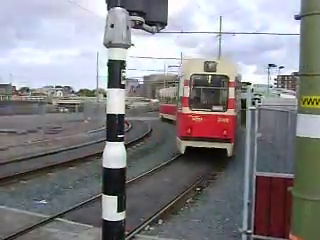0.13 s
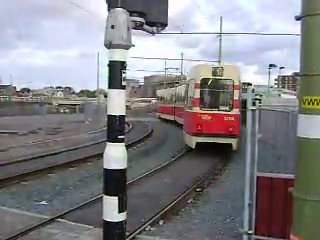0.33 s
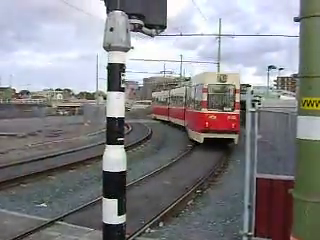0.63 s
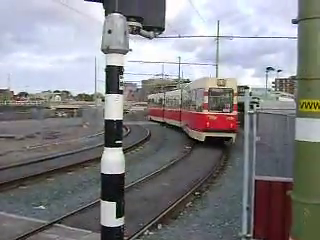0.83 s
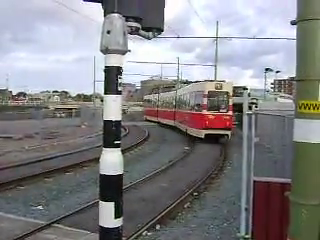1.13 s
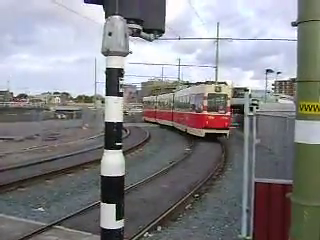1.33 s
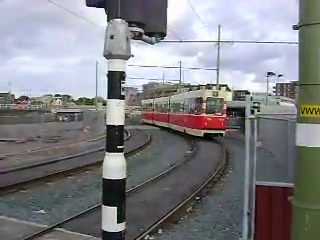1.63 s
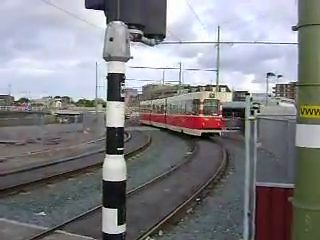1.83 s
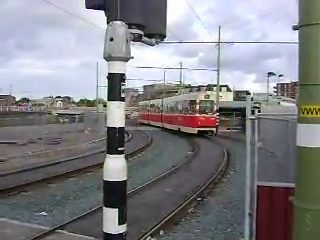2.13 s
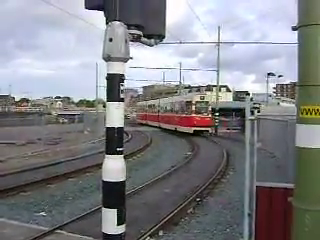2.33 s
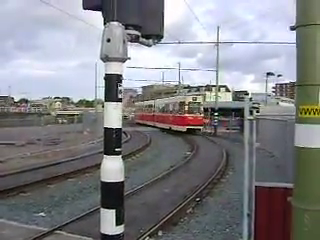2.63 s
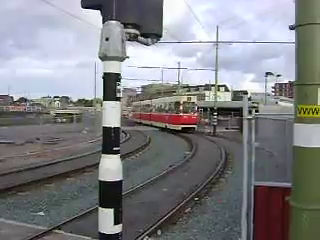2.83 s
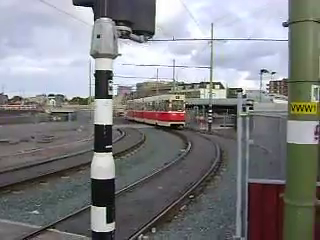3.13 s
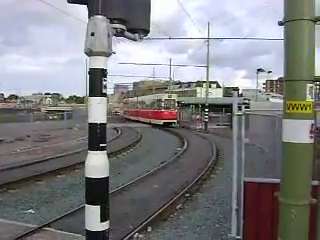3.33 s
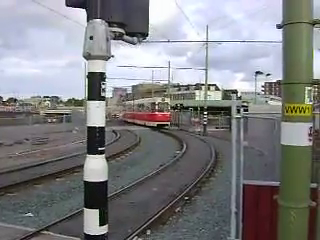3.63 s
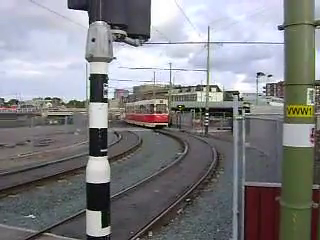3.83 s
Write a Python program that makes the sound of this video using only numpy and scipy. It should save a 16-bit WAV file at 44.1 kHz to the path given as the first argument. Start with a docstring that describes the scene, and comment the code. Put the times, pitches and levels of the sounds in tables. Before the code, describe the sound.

Loud wheel squeal from a tram rounding a bend, with metallic scraping and fading rolling rumble; after a near-silent gap come a soft knock and a weaker squeal, over town hum, light wind and yard echoes.

```python
"""Outdoors, beside a tight curve with echoes off a yard: a tram draws away over the town's hum.
From the start two wheels stick and slip, singing a few hertz apart near 1576 Hz so the squeal throbs, while
the flanges grind, bite and rasp and ring the wheel. The squeal sinks near 1.9 s, returns from 2.1 s, nearly
goes at 2.8 s, where the grinding sinks too; a dull knock comes at 3.28 s and a fainter squeal from 3.5 s.
All along, shaped noise makes the rolling fade, and soft puffs of wind touch the microphone."""
import sys
import numpy as np
from scipy import signal
from scipy.fft import rfft, irfft
from scipy.io import wavfile
from scipy.ndimage import uniform_filter1d

SR = 44100
rng = np.random.default_rng(int(sys.argv[2]) if len(sys.argv) > 2 else 0)


def wrap_up_sound(samples):
    """Save the sound to the file named by the first command line argument, as 16-bit audio."""
    columns = np.atleast_2d(samples).T
    # keep every value between -1 and 1, then stretch to whole-number steps
    tamed = np.clip(columns, -1, 1)
    steps = np.round(tamed * 32767).astype(np.int16)
    wavfile.write(sys.argv[1], SR, steps)


N = 176400
T = np.arange(N) / SR  # time in s


def undb(db):
    """Decibels to amplitude gain."""
    return 10 ** (np.asarray(db) / 20)


def unit(x):
    """Scale to rms 1."""
    return x / np.sqrt(np.mean(x ** 2))


def curve(rows, axis=1):
    """Gain over time, interpolated in dB from one column of a table."""
    rows = np.array(rows)
    return undb(np.interp(T, rows[:, 0], rows[:, axis]))


def swell(at, length):
    """A Gaussian rise and fall around one moment; length is its standard deviation in s."""
    return np.exp(-.5 * ((T - at) / length) ** 2)


def noise():
    """White Gaussian noise."""
    return rng.standard_normal(N)


def walk(rate):
    """Smooth random drift of rms 1: noise under a Gaussian low-pass, rate in Hz."""
    f = np.fft.rfftfreq(N, 1 / SR)
    return unit(irfft(rfft(noise()) * np.exp(-.5 * (f / rate) ** 2), N))


def colour(x, points):
    """Shape a spectrum by (Hz, dB) points, falling beyond both ends, steeper at the top; rms 1."""
    hz, db = np.array(points).T
    f = np.maximum(np.fft.rfftfreq(N, 1 / SR), 1)
    ends = np.minimum(f / hz[0], 1) ** 2 * np.minimum(hz[-1] / f, 1) ** 10
    gain = undb(np.interp(np.log(f), np.log(hz), db))
    return unit(irfft(rfft(x) * ends * gain, N))


def resonate(x, hz, width):
    """One resonance, gain 1 at its centre."""
    b, a = signal.iirpeak(hz, hz / width, fs=SR)
    return signal.lfilter(b, a, x)


def band(hz, width):
    """Noise passed twice through one resonance; rms 1."""
    once = resonate(noise(), hz, width)
    return unit(resonate(once, hz, width))


def turn(hz):
    """Phase of an oscillation with a moving pitch."""
    return 2 * np.pi * np.cumsum(hz) / SR


# Puffs of wind at the microphone: centre t/s, spread/s, level/dB
WIND_PUFFS = [(0.877, .04, -42), (1.362, 0.099, -51), (2.889, 0.045, -43.5), (3.216, .045, -46.5),
              (3.83, 0.044, -47)]
PUFF_HZ, PUFF_PASS_WIDTH_HZ = 93.7, 450
# Spectrum of the distant town: f/Hz, relative density/dB
TOWN_COLOUR = [(25, 1), (130, -1.5), (500, -1), (1400, -0.5), (1750, -6), (2050, -14), (3600, -16.5),
               (4800, -23.5), (5200, -23.5), (5600, -42), (6200, -47.5)]
TOWN_DB = -46.5  # mean level, which sways slowly


def air():
    """Far town hum as swaying shaped noise, and close puffs of low noise as wind on the microphone."""
    puffs = sum(undb(db) * swell(s, length) for s, length, db in WIND_PUFFS)
    wind = band(PUFF_HZ, PUFF_PASS_WIDTH_HZ) * puffs
    town = undb(TOWN_DB + 2.4 * walk(1.4)) * colour(noise(), TOWN_COLOUR)
    return wind + town


# Rolling noise fading with distance: t/s, level/dB
ROLL_LEVEL = [(0, -30.5), (.25, -33), (.9, -35), (1.4, -36.5), (2, -39.5), (2.6, -41.5), (2.9, -45),
              (3.1, -53), (4, -62)]
# Spectrum of the rolling noise: f/Hz, relative density/dB
ROLL_SPECTRUM = [(100, -10), (250, -11), (330, -5.5), (430, -0.5), (700, -5), (1050, -5), (1300, -8.5),
                 (1750, -6.5), (2000, -15.5), (2700, -12), (4200, -16), (5200, -33.5)]
# Faint ring of the rails: t/s, level/dB
RAIL_RING = [(0, -46.5), (1.7, -54), (2.05, -42), (2.4, -51.5), (3.2, -65), (4, -56.5)]
RAIL_RING_HZ, RAIL_RING_PASS_WIDTH_HZ = 2822, 41
# Low groans of the running gear: centre t/s, spread/s, level/dB, f/Hz
GEAR_GROANS = [(1.936, .06, -37, 609), (2.748, 0.079, -44.5, 561), (3.548, .018, -43.5, 720)]
GROAN_PASS_WIDTH_HZ = 180
# Spectrum of the dull knock: f/Hz, relative density/dB
KNOCK_SPECTRUM = [(60, -2.5), (200, 9), (700, -2), (1500, -4), (2500, -18), (5000, -22), (6500, -53)]
KNOCK_S, KNOCK_DECAY_S, KNOCK_DB = 3.28, 0.024, -33.5


def running_gear():
    """Shaped noise rumbles, narrow noise rings the rails and groans, and a decaying burst knocks."""
    roll = undb(0.8 * walk(25)) * colour(noise(), ROLL_SPECTRUM) * curve(ROLL_LEVEL)
    rail_ring = band(RAIL_RING_HZ, RAIL_RING_PASS_WIDTH_HZ) * curve(RAIL_RING)
    groans = sum(undb(db) * swell(s, length) * band(hz, GROAN_PASS_WIDTH_HZ)
                 for s, length, db, hz in GEAR_GROANS)
    knock_decay = (T > KNOCK_S) * np.exp(-abs(T - KNOCK_S) / KNOCK_DECAY_S)
    knock = undb(KNOCK_DB) * knock_decay * colour(noise(), KNOCK_SPECTRUM)
    return roll + rail_ring + groans + knock


GRAINS_PER_S, GRAIN_SPREAD_DB, CHATTER_DB = 3000, 3, 1.13


def friction():
    """Dense tiny impacts of steel on steel, at random moments, their strength swayed by chatter."""
    struck = rng.random(N) < GRAINS_PER_S / SR
    strength = undb(GRAIN_SPREAD_DB * noise() + CHATTER_DB * walk(48))
    return struck * noise() * strength


# Ringing modes of the wheel: f/Hz, width/Hz, relative level/dB
WHEEL_MODES = [(1470, 67, -2), (2190, 4.7, -4.5), (2528, 21, -5.5), (2760, 23, -21), (3160, 28, -1.5),
               (3281, 22, 12.5), (3490, 20, -5.5), (3811, 22, 1.5), (4090, 20, -4.5), (4600, 50, -18),
               (4835, 15, -13.5)]


def wheel(push):
    """The wheel's modes, parallel resonances, ring under a push; rms 1."""
    return unit(sum(undb(db) * resonate(push, hz, width) for hz, width, db in WHEEL_MODES))


# Force of the flange on the rail: t/s, level before the scrape and ring gains/dB
FLANGE_FORCE = [(0, -37), (0.12, -38), (0.3, -28.5), (0.43, -39.5), (0.55, -26), (0.64, -32.5),
                (0.83, -23.5), (1.03, -34.5), (1.12, -35), (1.18, -30), (1.33, -36.5), (1.42, -28),
                (1.55, -35), (1.68, -28.5), (1.92, -43.5), (2.24, -45), (2.4, -29.5), (2.56, -42.5),
                (2.68, -43.5), (2.78, -63), (3.45, -61.5), (3.8, -50.5), (4, -58)]
# Spectrum of the scrape: f/Hz, relative density/dB
SCRAPE_COLOUR = [(1800, -19.5), (2650, -20.5), (2950, -7), (3100, -4.5), (3600, 0), (4100, -4.5),
                 (4420, -7), (4850, -4), (5300, -10), (5520, -16), (5750, -18.5), (6000, -42),
                 (6300, -43.5)]
SCRAPE_DB, RING_DB = -0.5, -5.5  # shares of scrape and wheel ring
# Hard bites, each making one mode squeak: centre t/s, spread/s, level/dB, f/Hz
FLANGE_BITES = [(.212, 0.018, -35, 2484), (.217, 0.015, -21.5, 3790), (0.235, 0.018, -34, 2195),
                (.297, .014, -35, 2230), (0.501, 0.011, -19, 4725)]
BITE_JITTER_HZ = 17
# Short shrill rasps: centre t/s, spread/s, level/dB, f/Hz
FLANGE_RASPS = [(0.211, 0.011, -28, 3407), (0.216, 0.014, -34.5, 4300), (0.219, 0.013, -30.5, 5390),
                (1.183, 0.01, -32.5, 4500), (1.371, 0.01, -36.5, 3630), (1.679, 0.011, -29, 3700),
                (3.3, 0.014, -55, 4400), (3.545, .01, -46, 4170), (3.748, 0.012, -31.5, 4740),
                (3.816, 0.011, -32.5, 4770), (3.91, 0.01, -30.5, 4680), (3.973, .012, -35.5, 4710)]
RASP_WIDTH_HZ = 160


def flange():
    """Friction grains scrape and ring the wheel; jittered sines squeak at bites, narrow scrape rasps."""
    grains = friction()
    scrape = colour(grains, SCRAPE_COLOUR)
    steel = undb(SCRAPE_DB) * scrape + undb(RING_DB) * wheel(grains)
    grind = steel * curve(FLANGE_FORCE) * undb(1.8 * walk(32))
    bites, rasps = 0, 0
    for s, length, db, hz in FLANGE_BITES:
        squeak = unit(np.sin(turn(hz + BITE_JITTER_HZ * walk(80))))
        bites = bites + undb(db) * swell(s, length) * squeak
    for s, length, db, hz in FLANGE_RASPS:
        shrill = unit(resonate(scrape, hz, RASP_WIDTH_HZ))
        rasps = rasps + undb(db) * swell(s, length) * shrill
    return grind + bites + rasps


# Stretches of beating: start t/s, end t/s, beat f/Hz, moment of one swell t/s,
# second wheel's mean level against the first/dB
BEAT_STRETCHES = [(0, 1.105, 10.8, 0.4982, -8), (1.112, 1.946, 10.38, 1.27, -12),
                  (1.964, 3.105, 9.6, 2.27, -8.5), (3.11, 4.1, 9.96, 3.672, -8)]
# Pitch of the leading wheel before wander and jitter: t/s, f/Hz
LEADING_PITCH = [(0, 1575.5), (2.6, 1576), (3.4, 1578.5)]
WANDER_HZ, JITTER_HZ = 1.3, 3.  # rms of slow and fast pitch drift
# Strength of the squeal before the gain below: t/s, level/dB
SQUEAL_LEVEL = [(0, -20.5), (0.22, -12), (0.42, -18), (0.5, -13), (0.62, -20), (0.74, -11.5), (0.88, -20),
                (0.97, -15), (1.12, -19.5), (1.42, -20), (1.63, -16), (1.87, -34.5), (2.0, -34.5),
                (2.08, -23), (2.3, -20.5), (2.59, -22), (2.8, -52), (3.39, -54.3), (3.56, -28.5),
                (3.68, -25), (3.85, -29), (4, -28.5)]
SQUEAL_GAIN_DB, FLUTTER_DB = 1.5, 0.84
# Brief dips of the squeal: centre t/s, spread/s, depth/dB
SQUEAL_DIPS = [(0.065, 0.0046, -15.5), (.308, 0.0065, -16), (.432, 0.0056, -13), (0.662, 0.007, -11.5),
               (0.911, 0.0026, -14), (2.132, .005, -13.5), (2.423, 0.0062, -11), (3.869, 0.0046, -13)]
SCATTER_DB, SCATTER_HZ = -13.5, 34.7  # each scattered part, and how fast it changes
# Overtones before their gains: t/s, second harmonic level/dB, third harmonic level/dB
OVERTONE_LEVELS = [(0, -49.5, -62), (0.25, -33, -29.5), (0.42, -37, -44.5), (0.52, -44.5, -34),
                   (0.87, -24, -23), (1.0, -32, -34.5), (1.5, -37.5, -33), (1.75, -45.5, -41),
                   (1.98, -51, -62.2), (2.1, -47, -46), (2.25, -41, -44), (2.43, -29.5, -24.5),
                   (2.8, -64, -74), (3.45, -72, -79), (3.7, -50.5, -43), (4, -52, -50.5)]
SECOND_GAIN_DB, THIRD_GAIN_DB = 0.5, 0.5
OVERTONE_FLUTTER_DB, OVERTONE_JITTER_HZ = 3.5, 18
THROB_DB = 2.5  # peak swing of the overtones with the beat


def squeal():
    """Two wheels stick and slip a few hertz apart and beat; rough overtones throb with them."""
    tone, throb = 0, 0
    steady_pitch = np.interp(T, *np.array(LEADING_PITCH).T)
    pitch = steady_pitch + WANDER_HZ * walk(8) + JITTER_HZ * walk(130)
    phase = turn(pitch)
    for start, end, beat_hz, swell_s, second_db in BEAT_STRETCHES:
        inside = ((T >= start) & (T < end)) * 1.
        during = uniform_filter1d(inside, size=900)  # edges about 20 ms long
        slip = 2 * np.pi * beat_hz * (T - swell_s) + 0.13 * walk(2.5)
        second = undb(second_db + 1.8 * walk(3))
        tone = tone + during * unit(np.sin(phase) + second * np.sin(phase + slip))
        throb = throb + during * np.cos(slip)

    # sound scattered off the moving tram roughens the tone
    scattered = walk(SCATTER_HZ) * np.sin(phase) + walk(SCATTER_HZ) * np.cos(phase)
    tone = tone + undb(SCATTER_DB) * scattered
    dips = sum(db * swell(s, length) for s, length, db in SQUEAL_DIPS)
    flutter = FLUTTER_DB * walk(18)
    out = tone * curve(SQUEAL_LEVEL) * undb(SQUEAL_GAIN_DB + flutter + dips)

    for column, db in enumerate([SECOND_GAIN_DB, THIRD_GAIN_DB], start=1):
        overtone_phase = turn((column + 1) * pitch + OVERTONE_JITTER_HZ * walk(200))
        rough = undb(OVERTONE_FLUTTER_DB * walk(70) + THROB_DB * throb)
        overtone = unit(np.sin(overtone_phase) * rough)
        out = out + overtone * undb(db) * curve(OVERTONE_LEVELS, axis=column)
    return out


ECHO_DB, ECHO_T60_S = -21.5, 0.81


def yard_echoes(tram):
    """Thin scatter of echoes from the yard: convolution with decaying noise of unit energy."""
    echoes = noise() * undb(-60 * T / ECHO_T60_S)
    echoes = echoes / np.sqrt(np.sum(echoes ** 2))
    return undb(ECHO_DB) * signal.fftconvolve(tram, echoes)[:N]


def scene():
    """The tram and its yard echoes in open air, at one microphone."""
    background = air()
    tram = running_gear() + flange() + squeal()
    return (background + tram + yard_echoes(tram))[None]


TOP_HZ = 6185


def record(dry):
    """A small microphone chain: a steep elliptic low-pass removes what lies above the middle treble."""
    lowpass = signal.ellip(12, .2, 80, TOP_HZ, fs=SR, output="sos")  # ripple and stopband in dB
    return signal.sosfilt(lowpass, dry)


dry = scene()
out = record(dry)
wrap_up_sound(out)
```